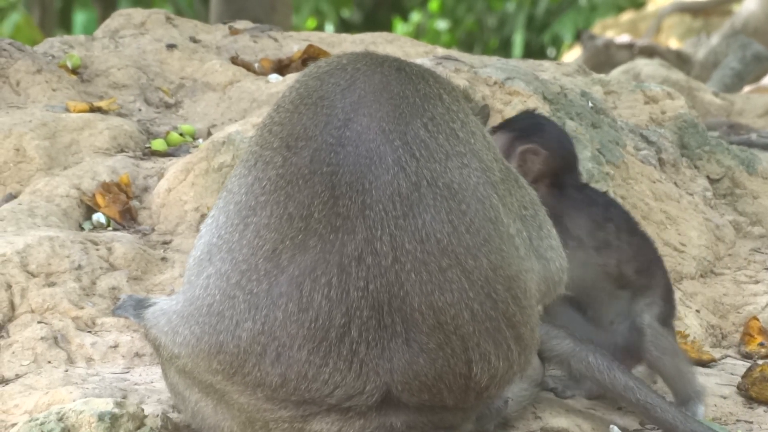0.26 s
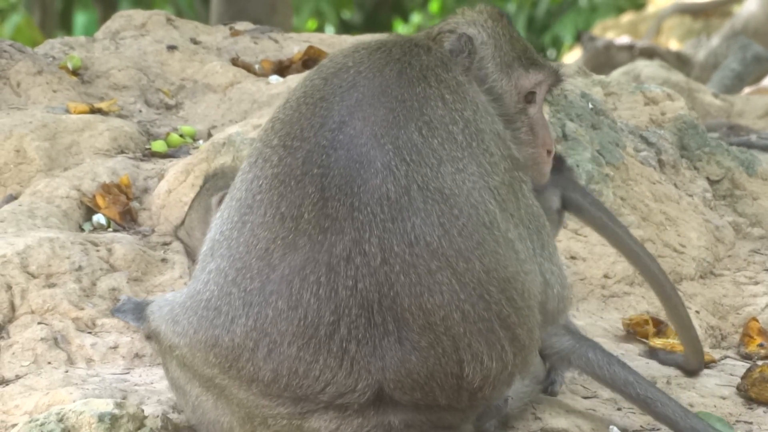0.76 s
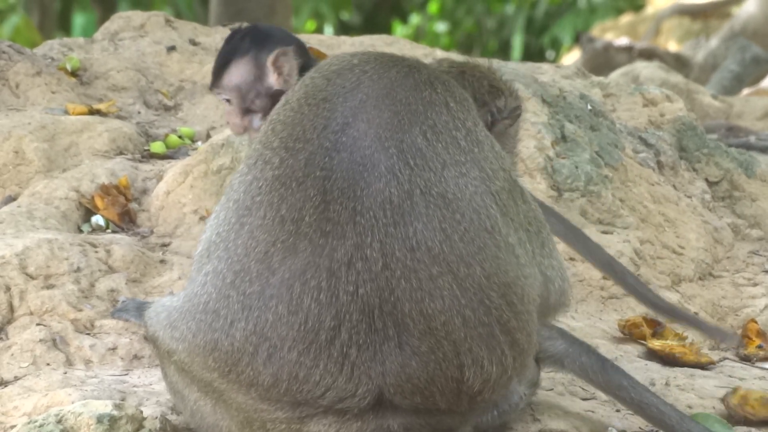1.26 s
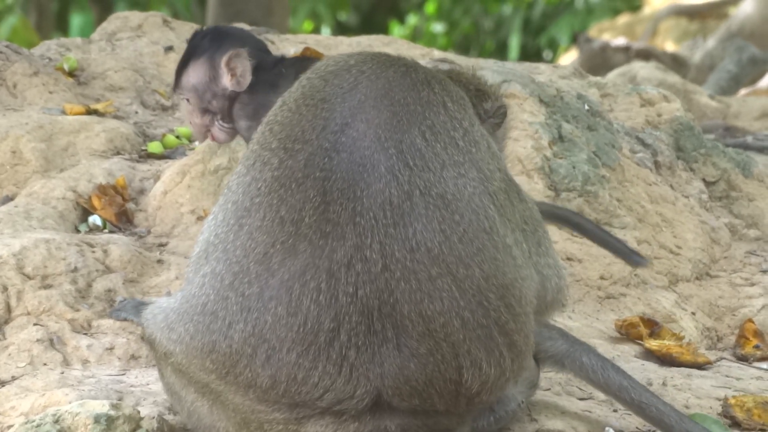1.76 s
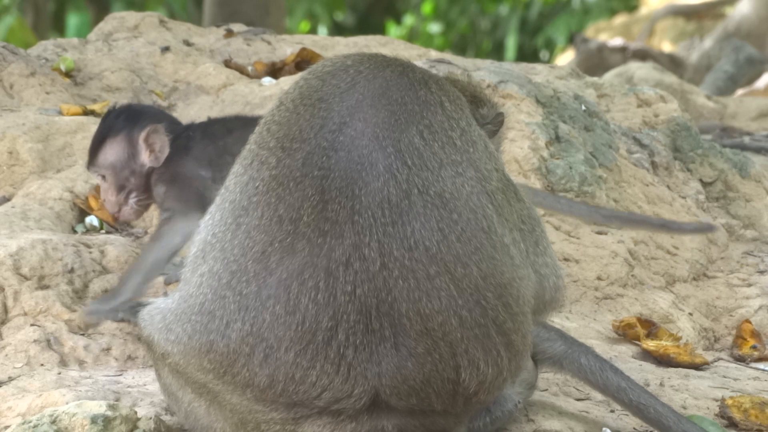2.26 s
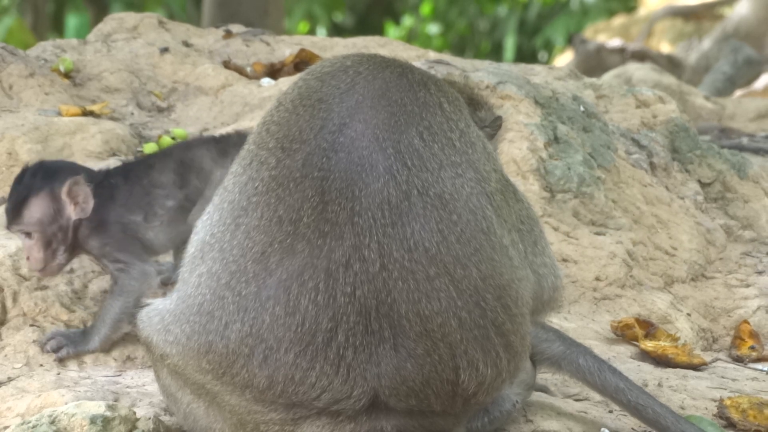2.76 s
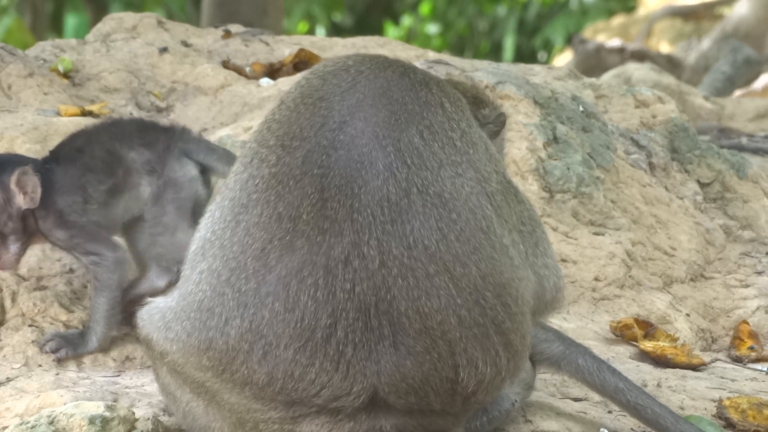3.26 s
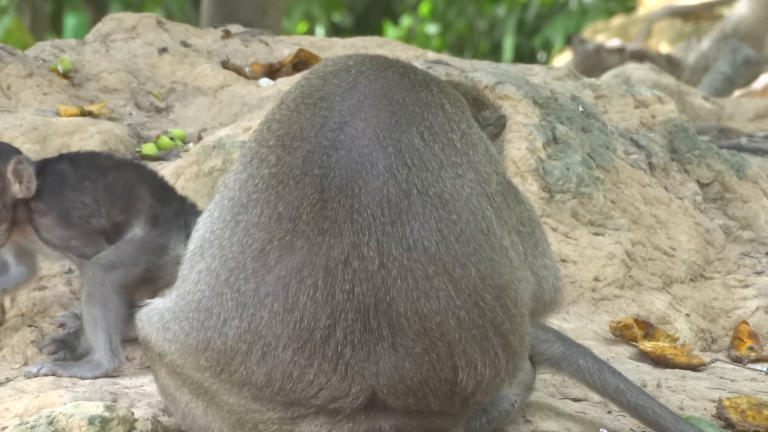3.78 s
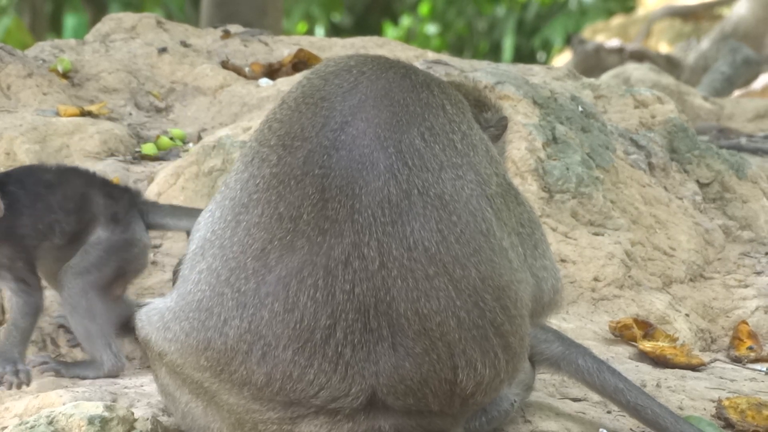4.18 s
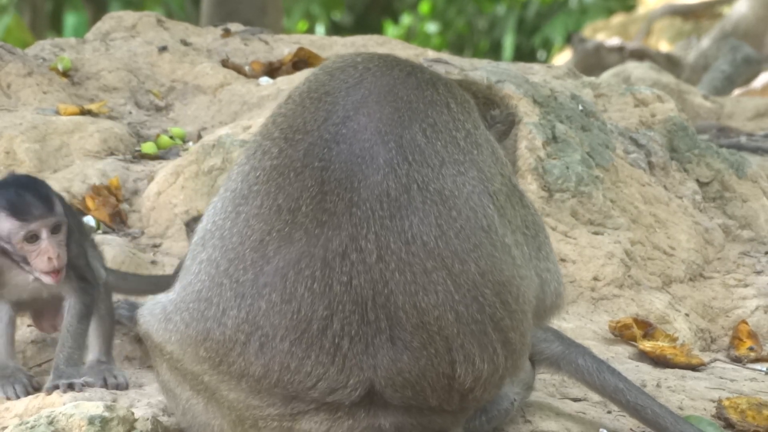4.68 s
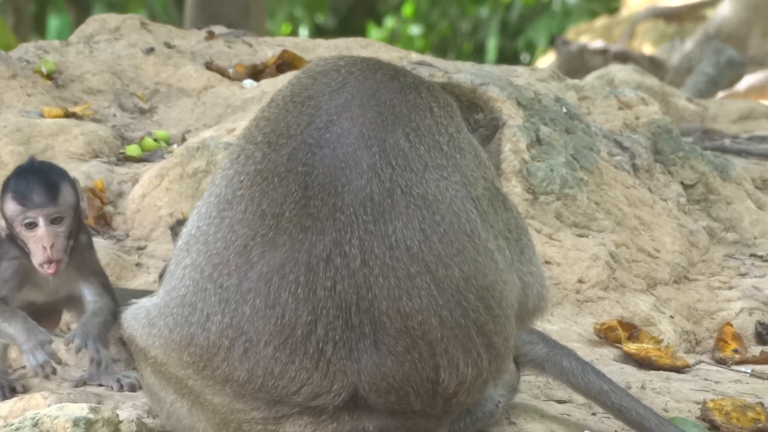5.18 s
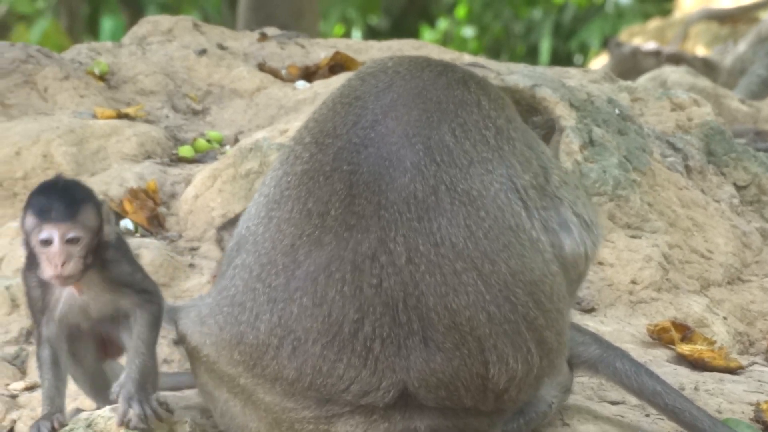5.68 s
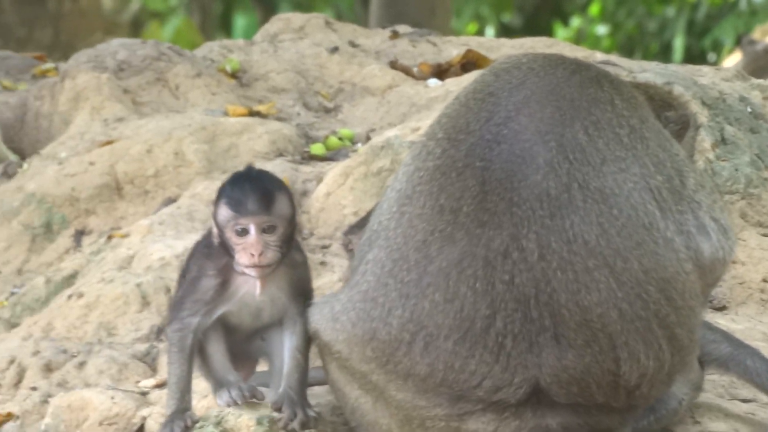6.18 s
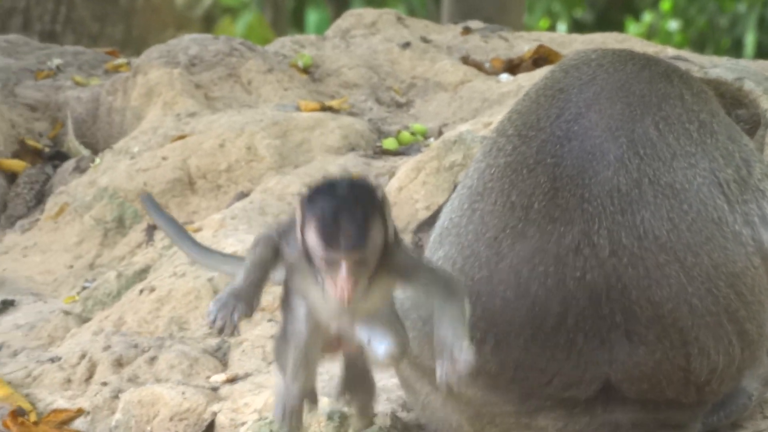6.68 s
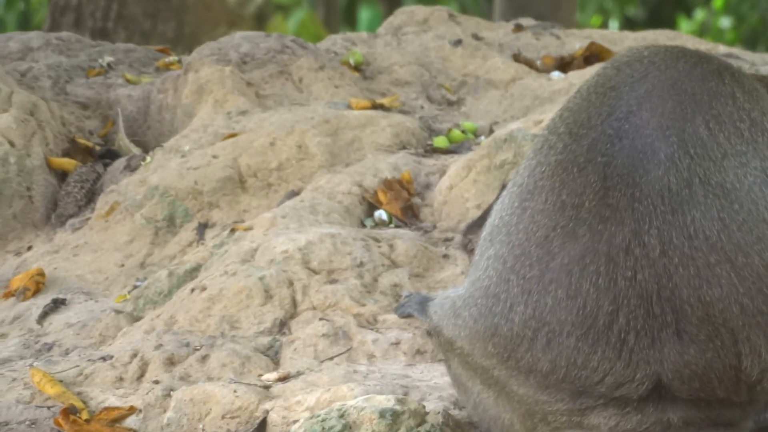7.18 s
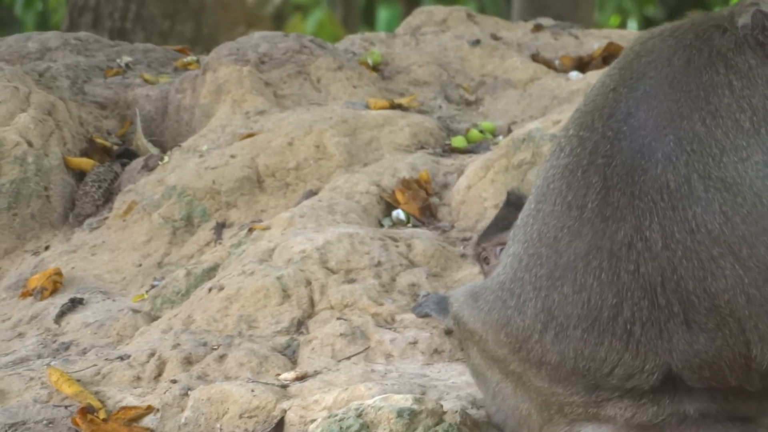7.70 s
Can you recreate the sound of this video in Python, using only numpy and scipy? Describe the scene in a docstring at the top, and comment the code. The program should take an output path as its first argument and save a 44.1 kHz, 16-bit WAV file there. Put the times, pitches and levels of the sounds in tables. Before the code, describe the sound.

Outdoors by a rocky bank, a small motorbike approaches from faint to a full rushing tyre roar, with a soft low putter and thin throbbing whine, then fades slowly. A second, softer one follows, nearly idling. A third arrives quicker and loudest, its whine higher. Close by, a monkey's paws make tiny gritty scuffs; a bird chirps faintly. Stereo microphone near the ground, traffic leaning slightly right.

```python
"""On a road beyond a rocky bank, three small motorbikes roll by, one after another.
Tyre friction is a broad noise whose level follows distance; each exhaust is a train of pulses and gas puffs
that rings a silencer. Drives whine as throbbing sines and tyres sing as narrow bands of noise while they pass.
A bird chirps faintly in gliding sines, and close by a monkey scuffs the dry ground in short bursts of noise."""
import sys
import numpy as np
from scipy import signal
from scipy.fft import rfft, irfft, next_fast_len
from scipy.io import wavfile
from scipy.ndimage import uniform_filter1d

SR = 44100
rng = np.random.default_rng(int(sys.argv[2]) if len(sys.argv) > 2 else 0)


def dump_mix(stems):
    """Bounce the given channels to the path in sys.argv[1] as a 16-bit WAV at rate SR."""
    frames = np.atleast_2d(stems).T  # one column per channel
    limited = np.clip(frames, -1, 1)  # hard clip at full scale
    pcm = np.round(limited * 32767).astype(np.int16)
    wavfile.write(sys.argv[1], SR, pcm)


N = 350154
TIME = np.arange(N) / SR  # seconds
BINS = np.fft.rfftfreq(1024, 1 / SR)  # Hz
FRAMES = np.arange(N // 256 + 5) * 256 / SR  # seconds

# Tyres of each bike. Each row: time when loudest in seconds, seconds to draw near, seconds to draw away
# (both before the stretch and lag of a layer), then roar, hiss and rumble levels in dB.
PASSES = [(2.46, 0.45, 1.76, -37, -39.5, -51), (5.1, 0.92, 0.44, -41.5, -41.5, -60.5),
          (7.12, 0.45, 1.16, -35, -35, -47)]
# Relative spectra of the tyre layers. Each row: frequency in Hz, gain in dB.
ROAR = [(200, -50), (500, -40), (680, -6.5), (850, -0.5), (1250, -0.5), (1600, -1.5), (2200, -3),
        (2800, -8.5), (3700, -23), (5000, -26), (10000, -43), (16000, -60)]
HISS = [(400, -29.5), (900, -6.5), (2000, -2), (3600, 2), (4700, -0.5), (5700, -0.5), (6800, 1.5),
        (8500, 0.5), (9700, -5.5), (11000, -12), (12800, -19), (14500, -19), (16000, -29)]
RUMBLE = [(20, -46), (55, -46), (90, -19), (160, -8.5), (260, -6), (340, -4), (420, -3.5), (530, 0.5),
          (680, 0), (900, -8), (2000, -42)]
SHEEN_DB = 1.27  # rms of the faint lingering bands in the roar
# Brief brightenings of the hiss. Each row: peak in seconds, spread in seconds, peak in dB before the share.
BRIGHTENINGS = [(1.65, 0.37, 4.5), (2.8, .2, 2), (5.6, 0.14, 3), (6.651, 0.2, 0)]
# Where the hiss brightens. Each row: frequency in Hz, share of the brightening.
BRIGHT_SHARE = [(2000, 0.28), (6000, 0.28), (9000, 0.45), (12500, 1)]
# A bright band sliding down through the hiss as the first bike comes abreast.
# Each row: time in seconds, centre in Hz, gain at the centre in dB.
SLIDE = [(1.9, 8900, 0), (2.2, 8700, 1.5), (2.6, 7900, 2.5), (2.95, 6600, 4.5), (3.2, 6250, 3),
         (3.8, 6100, 1)]
SLIDE_WIDTH_HZ = 390  # standard deviation
# Narrow bands sung by tread and running gear.
# Each row: peak in seconds, spread in seconds, centre in Hz, width in Hz, level in dB.
SINGING = [(.8, .35, 1130, 230, -59), (1.5, .12, 1500, 180, -56), (1.75, .22, 580, 240, -58),
           (2.2, .18, 1480, 220, -47.5), (2.6, .3, 980, 380, -43), (2.75, .2, 1980, 220, -48.5),
           (2.85, .13, 750, 130, -47), (3.14, .14, 1300, 130, -45.3), (3.26, .13, 2130, 220, -45.3),
           (3.35, .2, 1800, 230, -45.3), (3.7, .2, 812, 135, -43.8), (4.2, .2, 1250, 130, -50.5),
           (4.4, .5, 2250, 650, -49), (5.0, .25, 1280, 180, -48.5), (5.3, .1, 845, 50, -49.5),
           (5.5, .13, 2800, 550, -50.5), (5.85, .3, 1020, 130, -52), (6.45, .16, 1690, 110, -50.5),
           (6.75, .04, 2300, 150, -41.5), (7.17, .17, 1065, 100, -39.5), (7.2, .03, 2250, 350, -42),
           (7.45, .14, 560, 140, -47), (7.54, .14, 4750, 550, -45), (7.55, .14, 4600, 50, -50),
           (7.57, .09, 2050, 130, -45), (7.6, .075, 1375, 150, -37.6), (7.87, .12, 1650, 110, -45)]

# Exhaust of each bike. Each row: time when loudest in seconds, seconds to draw near, seconds to draw away,
# level in dB before the ground colour and the echoes.
EXHAUSTS = [(3.05, .72, 1.45, -53.2), (4.85, 1.1, 1.5, -54.2), (7.53, 0.48, 0.7, -46)]
EXHAUST_FALL_DB = 41.5  # lost for each tenfold distance, when far
# Firing rates of the three engines. Each row: time in seconds, firings per second.
FIRST_RATE = [(0, 23.6), (.7, 23.7), (1.7, 24.15), (2.6, 24.6), (3.5, 24.7), (5, 24.8)]
SECOND_RATE = [(3, 18.745), (4.4, 18.9), (5.8, 18.8), (7.9, 19.4)]
THIRD_RATE = [(5.6, 34.6), (6.5, 35), (7.2, 35.25), (7.9, 35.1)]
LOOSE_S = .00025  # rms earliness or lateness of the firings
# Responses of their silencers. Each row: frequency in Hz, gain in dB.
FIRST_PIPE = [(30, -41), (70, -20), (100, -8), (150, -2.5), (195, -6.5), (245, 1.5), (280, 4.5), (350, -2),
              (450, -21), (900, -7), (2500, -41)]
SECOND_PIPE = [(30, -51), (65, -16), (92, 1.5), (125, 4.5), (155, 6.5), (215, -3.5), (280, 2), (360, -7.5),
               (520, -4.5), (900, -21), (2500, -38)]
THIRD_PIPE = [(35, -62), (70, -11), (105, -14), (140, -2.5), (175, 2.5), (210, 2), (245, -13), (280, 1),
              (315, 5), (350, 10), (390, -4), (425, -9), (460, -15), (610, 1), (700, -4), (1000, -17),
              (2500, -45)]
# Colour the ground gives a distant exhaust. Each row: frequency in Hz, gain in dB.
GROUND = [(100, -4), (160, 2), (235, 3), (345, -11), (600, 2.5)]

# Whines of the first and third bikes' drives, the last one thinner and higher.
# Each row: time in seconds, pitch in Hz, level in dB.
FIRST_WHINE = [(0, 739, -74), (.75, 741, -65), (1.3, 744, -61), (1.72, 749, -53.5), (2.0, 751, -64),
               (2.5, 754, -59), (2.8, 756, -45), (3.15, 757, -50.5), (3.75, 759, -49.7), (4.2, 760, -53.5),
               (4.6, 760, -68), (5.2, 760, -100)]
THIRD_WHINE = [(5.7, 1090, -100), (6.3, 1090, -62), (6.6, 1092, -51), (6.8, 1080, -55), (7.0, 1078, -43.5),
               (7.14, 1085, -37.6), (7.3, 1090, -41), (7.5, 1095, -53), (7.9, 1095, -70)]
THIRD_HIGH_WHINE = [(5.8, 1700, -100), (6.35, 1705, -52), (6.8, 1712, -56), (7.05, 1717, -44.5),
                    (7.25, 1717, -58), (7.7, 1717, -100)]
# A whining gear of the first bike. The one row: peak in seconds, spread in seconds, pitch in Hz, level in dB.
GEAR = (2.89, .38, 377, -55)

# Scuffs on the dry ground. Each row: peak in seconds, spread in seconds, level in dB,
# tilt in dB at 8 kHz relative to 1 kHz.
SCUFFS = [(.055, .016, -53.5, 0), (.323, .012, -52, 4), (.461, .003, -47.5, -14), (.83, .03, -54, -6),
          (1.008, .005, -51.5, 10), (1.022, .0036, -44.5, 10), (1.198, .004, -49, 6), (2.195, .005, -45, 8),
          (2.855, .014, -44, 8), (7.124, .007, -36.5, -16), (7.135, .005, -42, 6), (7.433, .002, -38, 3)]
# Relative spectrum of the grit. Each row: frequency in Hz, gain in dB.
GRIT = [(200, -34), (900, -1.5), (3200, 1), (5000, -12.5), (7200, 2), (9000, 3), (10800, -19), (13000, -34),
        (16000, -42)]
# Bird chirps. Each row: peak in seconds, spread in seconds, pitch at the peak in Hz, glide in Hz per second,
# level in dB before the echoes.
CHIRPS = [(3.205, .008, 6250, -9000, -45), (5.388, .009, 3020, -15000, -44),
          (5.706, .004, 2550, -8000, -45.5), (5.788, .006, 2550, 16000, -44.2),
          (6.908, .005, 7020, 45000, -37.5)]

# Bearing of the traffic. Each row: time in seconds, left minus right in dB before the band's share.
BEARING = [(0.0, 0.5), (1.81, -1), (3.14, -3), (4.47, -3.0), (6.48, -0.5), (7.67, -3.0), (7.94, -2.5)]
# How strongly each band shows the bearing. Each row: frequency in Hz, share.
SHADOW = [(200, .05), (400, .3), (750, 1), (1400, .75), (2200, 1.15), (3100, 1.65), (4400, 1.1),
          (6300, .85), (8800, 0), (10700, 2.3), (12600, .2)]
# Likeness of the two sides. Each row: frequency in Hz, index (1 for no diffuse difference).
SAME = [(20, .97), (45, .999), (300, 1), (800, 0.99), (2500, 0.93), (5000, 0.99), (8000, 0.99),
        (9200, 0.98), (10700, 0.6), (12800, 1)]
# Phase lead of left over right. Each row: frequency in Hz, lead in radians.
LEAD = [(60, -0.092), (250, 0.14), (900, 0.37), (2000, -0.045), (4000, 0.043), (8000, -0.032),
        (10000, -.33), (11300, .06), (14000, 0)]
EDGE_HZ = 15650


def tyres():
    """Friction noise in three layers: rubber on the road rumbles, roars and hisses, each falling with distance."""
    roar_db = traffic(TIME, order=0, stretch=1, lag_s=0, fall_db=32.0)
    hiss_db = traffic(TIME, order=1, stretch=1.313, lag_s=0.03, fall_db=27.0)
    rumble_db = traffic(TIME, order=2, stretch=2.3, lag_s=0.26, fall_db=33.5)
    far = np.clip((-39.5 - np.interp(FRAMES, TIME, hiss_db)) / 10, 0, 2)[:, None]
    # from afar the ground swallows the low mids
    ground_db = far * colour([(200, -5.5), (370, -14.0), (560, -1)], BINS)
    rumble = noise(colour(RUMBLE, BINS) + ground_db, patchy_db=1.0) * amp(rumble_db)
    roar = noise(colour(ROAR, BINS) + sheen(), patchy_db=1.74) * amp(roar_db + 0.17 * drift(25))
    hiss = noise(hiss_colour(far), patchy_db=1.45) * amp(hiss_db + 0.69 * drift(71))
    return rumble + roar + hiss


def sheen():
    """Spectral persistence: a random field smoothed chiefly along time leaves faint narrow bands, in dB."""
    bands = rng.standard_normal((len(FRAMES), len(BINS)))
    lingering = uniform_filter1d(bands, size=50, axis=0)
    return SHEEN_DB * unit(uniform_filter1d(lingering, size=3, axis=1))


def hiss_colour(far):
    """Absorption and interference: air dulls the distant hiss, a ground echo notches it; it also brightens."""
    air_db = far * colour([(3300, 1.7), (4700, -0.5), (8000, 1.0), (11000, 0.5), (14000, -7.0)], BINS)
    brightening = sum(db * np.exp(-.5 * ((FRAMES - s) / spread) ** 2) for s, spread, db in BRIGHTENINGS)
    bright_db = brightening[:, None] * colour(BRIGHT_SHARE, BINS)
    # the ground echo cuts a broad notch while the first bike draws near
    nearing = np.exp(-.5 * ((FRAMES - 2.3) / 0.46) ** 2)[:, None]
    notch_db = nearing * colour([(2800, 2.0), (4900, -1.5), (6800, 0.5), (9000, 1.5), (12000, 0.5)], BINS)
    slide_s, slide_hz, slide_top_db = np.transpose(SLIDE)
    off_centre = (BINS - np.interp(FRAMES, slide_s, slide_hz)[:, None]) / SLIDE_WIDTH_HZ
    slide_db = np.interp(FRAMES, slide_s, slide_top_db)[:, None] * np.exp(-.5 * off_centre ** 2)
    return colour(HISS, BINS) + air_db + notch_db + slide_db + bright_db


def traffic(t, order, stretch, lag_s, fall_db):
    """Addition of powers: dB level of a tyre layer (0 roar, 1 hiss, 2 rumble); stretch widens its beam."""
    power = 0
    for s, near_s, away_s, *levels in PASSES:
        level_db = passing(t - lag_s, s, stretch * near_s, stretch * away_s, levels[order], fall_db)
        power = power + amp(level_db) ** 2
    return 10 * np.log10(power)


def passing(t, s, near_s, away_s, db, fall_db):
    """Spreading loss: dB level on a straight road, lower by fall_db for each tenfold distance."""
    along = (t - s) / np.where(t < s, near_s, away_s)
    return db - fall_db * np.log10(np.hypot(1, along))


def tread():
    """Narrow-band noise: tread and running gear sing fuzzy tones that rise out of the roar and sink back."""
    out = np.zeros(N)
    for s, spread, hz, width, db in SINGING:
        heard = np.flatnonzero(np.abs(TIME - s) < 4 * spread)
        size = next_fast_len(len(heard))
        f = np.fft.rfftfreq(size, 1 / SR)
        random_phase = np.exp(2j * np.pi * rng.random(len(f)))
        band = random_phase / (1 + ((f - hz) / (0.62 * width)) ** 4)
        tone = irfft(band, size)[:len(heard)]
        # dividing by the local rms makes the tone even
        even = tone / np.sqrt(uniform_filter1d(tone ** 2, size=1800))
        out[heard] += swell(s, spread, db)[heard] * even
    return out


def exhausts():
    """Periodic excitation of resonators: the first bike coasts, the second idles, the third is lightly throttled."""
    coasting, idling, pulling = EXHAUSTS
    first = engine(FIRST_RATE, coasting, FIRST_PIPE, uneven_db=1.3, gas=0.5, puff_s=.014)
    second = engine(SECOND_RATE, idling, SECOND_PIPE, uneven_db=1.1, gas=0.9, puff_s=.014)
    third = engine(THIRD_RATE, pulling, THIRD_PIPE, uneven_db=0.7, gas=0.24, puff_s=0.012)
    return scatter(first + second + third, wet_db=-10.5, decay_s=0.04)


def engine(rate, ride, pipe, uneven_db, gas, puff_s):
    """Source and filter: each firing of one cylinder sends a pulse and a puff of gas down the silencer."""
    per_s = curve(rate, TIME)
    level_db = passing(TIME, *ride, EXHAUST_FALL_DB)
    firings = np.cumsum(per_s) / SR + per_s * LOOSE_S * drift(9)
    turns = np.maximum(firings, 0)
    stroke = turns.astype(int)
    strength = amp(uneven_db * rng.standard_normal(1000))[stroke]
    pulses = np.diff(stroke, prepend=0).astype(float)
    # the gas hisses above the thump and decays after each firing
    turbulence = ring(rng.standard_normal(N), [(150, -10), (300, -5.0), (600, 0.0)])
    since_firing_s = (turns % 1) / per_s
    puffs = turbulence * np.exp(-since_firing_s / puff_s)
    blast = strength * (unit(pulses) + gas * unit(puffs))
    exhaust = unit(ring(blast, pipe))
    # the farther away the bike, the more its sound skims the ground
    far = np.clip((level_db.max() - level_db) / 11, 0, 1)
    return amp(level_db) * ((1 - far) * exhaust + far * ring(exhaust, GROUND))


def whines():
    """Tonal drive noise: the first bike's whine is long and thin, the third's two short, higher and a bit steadier."""
    first = whine(FIRST_WHINE, FIRST_RATE, throb=.65, waver_db=3)
    third = whine(THIRD_WHINE, THIRD_RATE, throb=.6, waver_db=2.5)
    high = whine(THIRD_HIGH_WHINE, THIRD_RATE, throb=.5, waver_db=2.5)
    return first + third + high


def whine(rows, rate, throb, waver_db):
    """Amplitude modulation: a thin drive tone throbs near the firing rate and wavers in the air."""
    s, hz, db = np.transpose(rows)
    turns = np.cumsum(np.interp(TIME, s, hz) * (1 + .003 * drift(12))) / SR
    firing = np.cos(2 * np.pi * np.cumsum(curve(rate, TIME)) / SR + .6 * drift(8))
    tone = (1 + throb * firing) * amp(waver_db * drift(22)) * np.sin(2 * np.pi * turns)
    return amp(np.interp(TIME, s, db)) * unit(tone)


def gear():
    """Frequency and amplitude modulation: a gear's whine wavers and flutters, held while the bike is abreast."""
    s, spread, hz, db = GEAR
    turns = np.cumsum(hz * (1 + 0.0031 * drift(7.8))) / SR
    hold = np.exp(-((TIME - s) / spread) ** 4)  # flat-topped
    flutter = amp(2.4 * drift(25))
    return hold * amp(db) * unit(flutter * np.sin(2 * np.pi * turns))


def scuffs():
    """Granular friction: paws brush the ground in short gritty bursts, dull on rock, bright on dead leaves."""
    grit = noise(colour(GRIT, BINS), patchy_db=1.5) * unit(amp(3.8 * drift(540)))
    out = np.zeros(N)
    for s, spread, db, bright_db in SCUFFS:
        brush = unit(ring(grit, [(1000, 0), (8000, bright_db)]))
        out += swell(s, spread, db) * brush
    return out


def chirps():
    """Linear frequency glides: tiny bird calls, blurred by the trees and half buried in the rush."""
    calls = np.zeros(N)
    for s, spread, hz, glide, db in CHIRPS:
        t = TIME - s
        tone = np.sin(2 * np.pi * (hz + .5 * glide * t) * t)
        calls += swell(s, spread, db) * unit(tone)
    return scatter(calls, wet_db=-7, decay_s=.05)


def scatter(x, wet_db, decay_s):
    """Multiple reflection: rocks and trunks return a short decaying spray of echoes."""
    t = TIME[:SR // 4]
    echoes = rng.standard_normal(len(t)) * np.exp(-t / decay_s) * (t > .006)
    return x + amp(wet_db) * signal.oaconvolve(x, echoes / np.linalg.norm(echoes))[:N]


def ports(x):
    """Shadowing and coherence: a body shades one of two close microphone ports; a little diffuse sound differs."""
    hz, t, z = signal.stft(x, SR, nperseg=1024, noverlap=768)
    # each side takes half of the level and phase difference
    shade = amp(.5 * colour(SHADOW, hz)[:, None] * curve(BEARING, t))
    lean = shade * np.exp(.5j * colour(LEAD, hz))[:, None]
    same = np.clip(colour(SAME, hz), 0, 1)[:, None]
    random_phase = np.exp(2j * np.pi * rng.random(z.shape))
    diffuse = 2 * np.sqrt((1 - same) / (1 + same)) * z * random_phase
    pair = np.array([(z + diffuse) * lean, (z - diffuse) / lean])
    return signal.istft(pair, nperseg=1024, noverlap=768)[1][:, :N]


def amp(db):
    """Logarithmic level: decibels to gain."""
    return 10 ** (np.asarray(db) / 20)


def unit(x):
    """Normalisation: scales to an rms of one."""
    return x / np.sqrt(np.mean(np.abs(x) ** 2) + 1e-20)


def curve(rows, t):
    """Linear interpolation: rows of (seconds, value) read at the times t."""
    return np.interp(t, *np.transpose(rows))


def colour(points, hz):
    """Spectral envelope: rows of (Hz, value) read on a log-frequency axis."""
    f, value = np.transpose(points)
    return np.interp(np.log(hz + 1), np.log(f + 1), value)


def swell(s, spread, db):
    """Gaussian envelope: a bell-shaped rise and fall of gain."""
    return amp(db) * np.exp(-.5 * ((TIME - s) / spread) ** 2)


def drift(per_s):
    """Low-passed randomness: a smooth wander of unit rms."""
    lowpass = np.exp(-(np.fft.rfftfreq(N, 1 / SR) / per_s) ** 2)
    return unit(irfft(rfft(rng.standard_normal(N)) * lowpass, N))


def noise(db, patchy_db):
    """Spectral shaping: unit noise with a dB field over (frames, bins), mottled by small fleeting patches."""
    a, b, patches = rng.standard_normal((3, len(FRAMES), len(BINS)))
    patches = uniform_filter1d(patches, size=9, axis=0)
    patches = unit(uniform_filter1d(patches, size=4, axis=1))
    z = (a + 1j * b) * amp(db + patchy_db * patches)
    return unit(signal.istft(z.T, nperseg=1024, noverlap=768)[1][:N])


def ring(x, points):
    """Minimum-phase filtering: a causal response with the given spectrum, found by the Hilbert relation."""
    size = 8192
    log_gain = np.log(amp(colour(points, np.abs(np.fft.fftfreq(size, 1 / SR)))))
    response = np.fft.ifft(np.exp(np.conj(signal.hilbert(log_gain)))).real
    return signal.oaconvolve(x, response[:size // 2])[:N]


def scene():
    """Superposition: the road and the near ground, heard from the bank."""
    road = tyres() + tread() + exhausts() + whines() + gear()
    return ports(road + scuffs() + chirps())


def record(dry):
    """Band limitation: a linear-phase low-pass at the recorder's upper edge."""
    lowpass = signal.firwin(801, EDGE_HZ, window=("kaiser", 9), fs=SR)
    return signal.oaconvolve(dry, lowpass[None], "same")


dry = scene()
out = record(dry)
dump_mix(out)
```